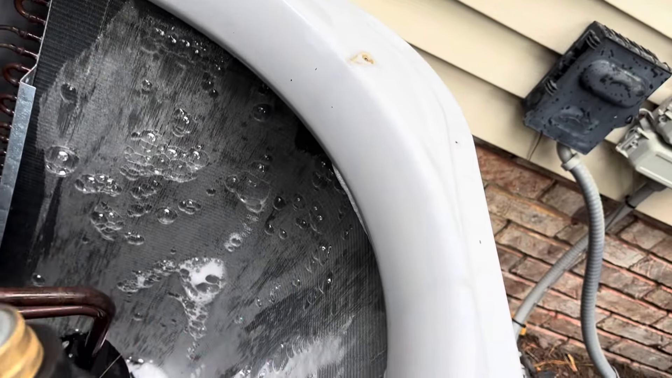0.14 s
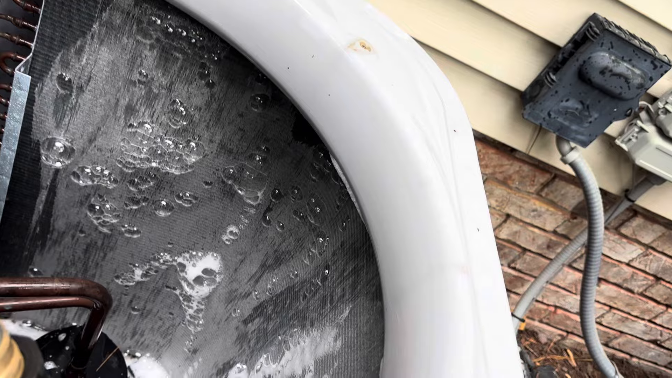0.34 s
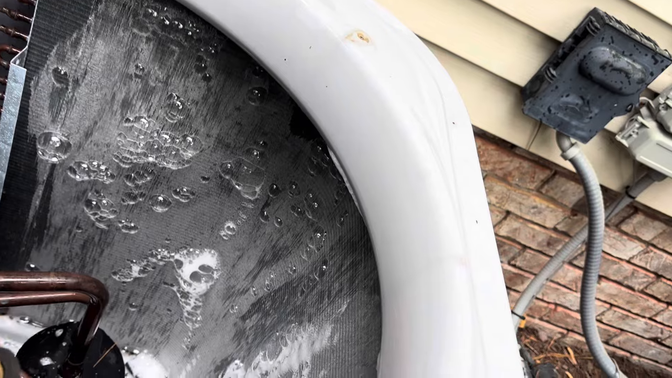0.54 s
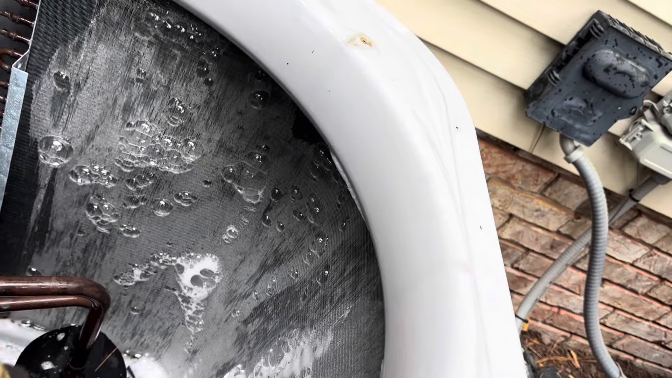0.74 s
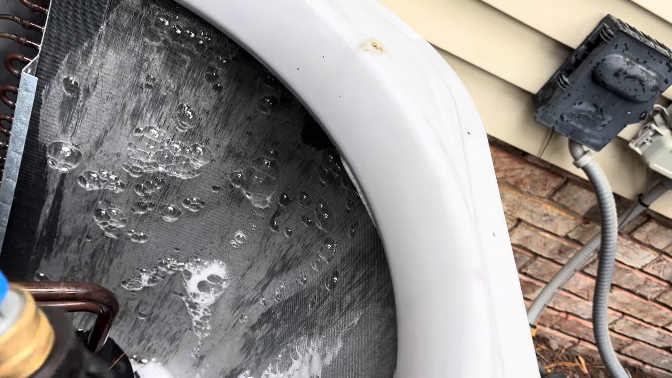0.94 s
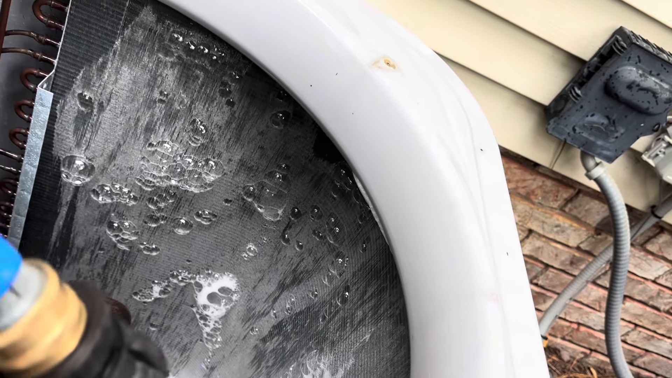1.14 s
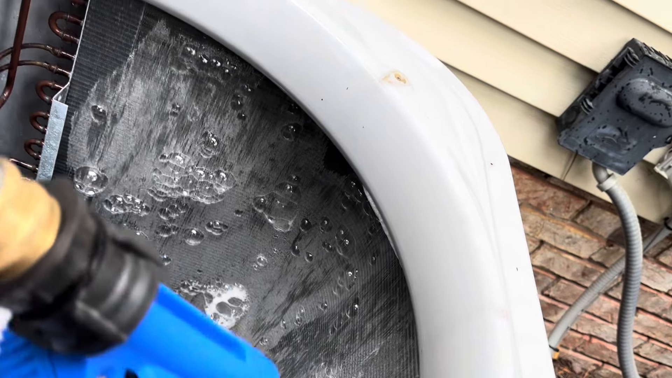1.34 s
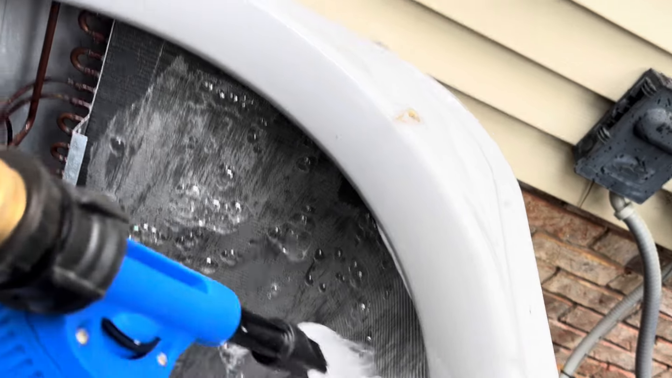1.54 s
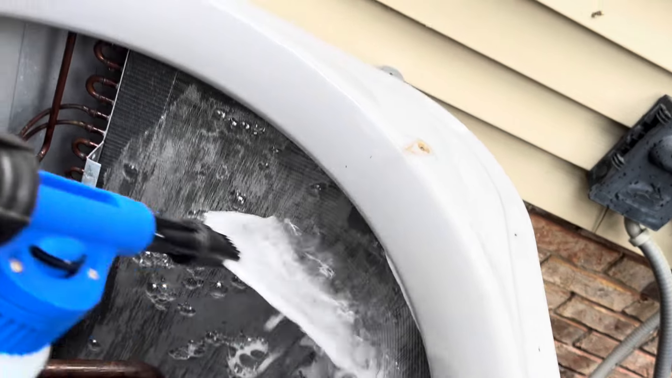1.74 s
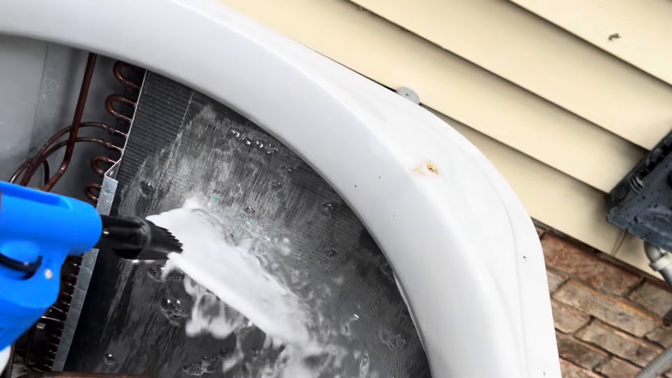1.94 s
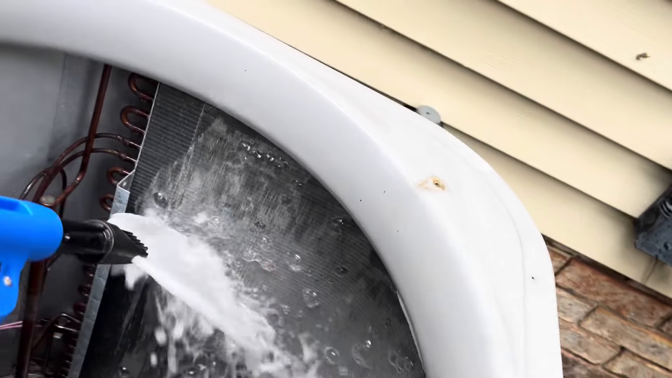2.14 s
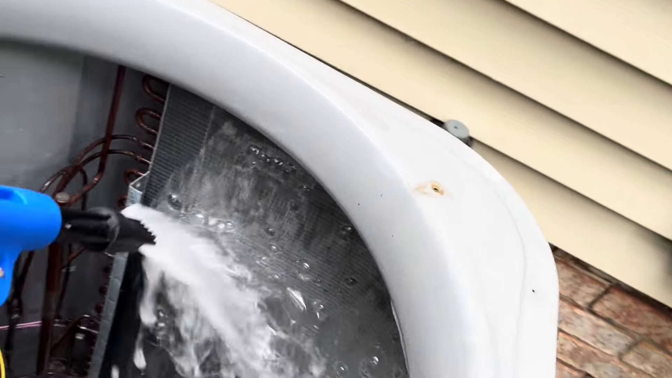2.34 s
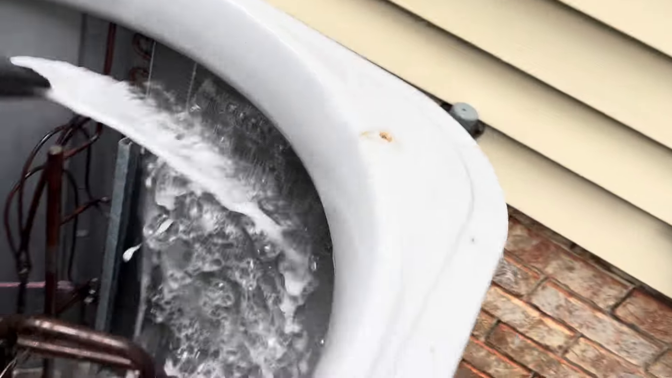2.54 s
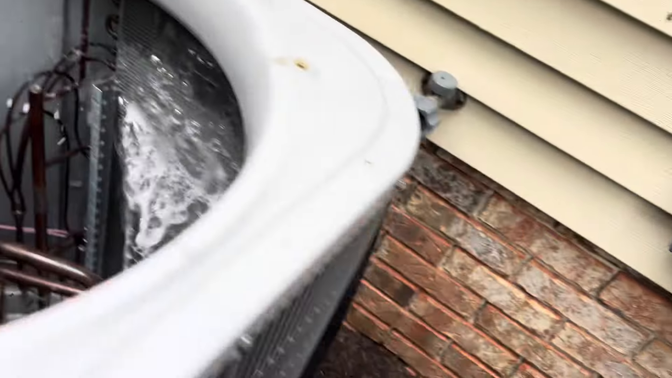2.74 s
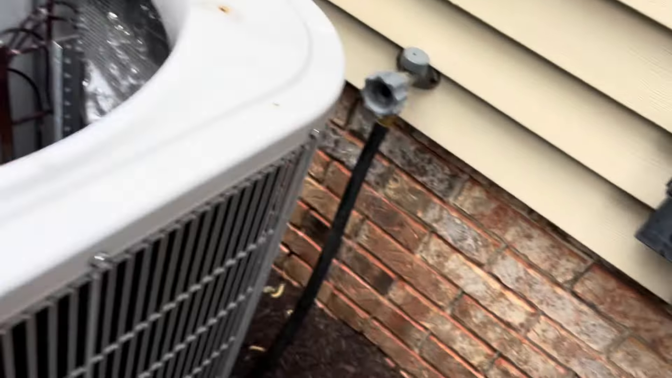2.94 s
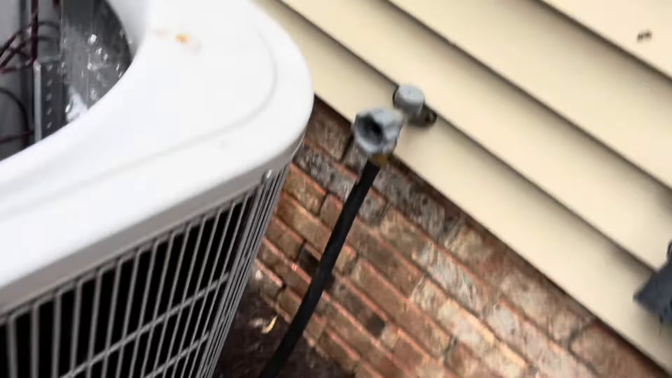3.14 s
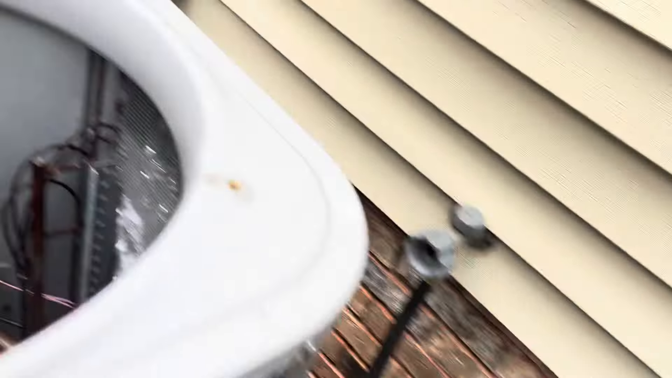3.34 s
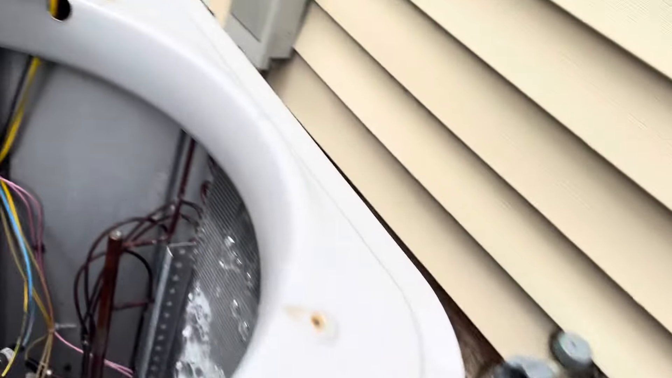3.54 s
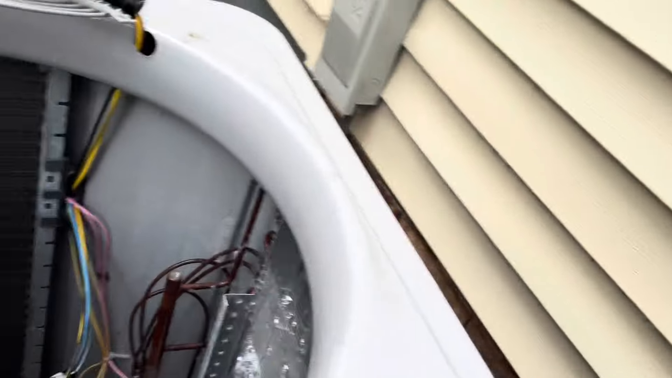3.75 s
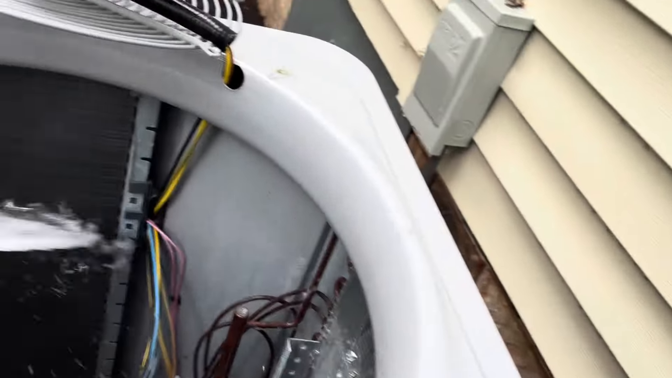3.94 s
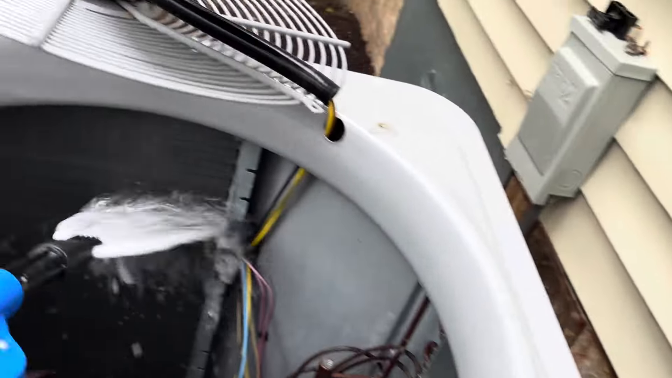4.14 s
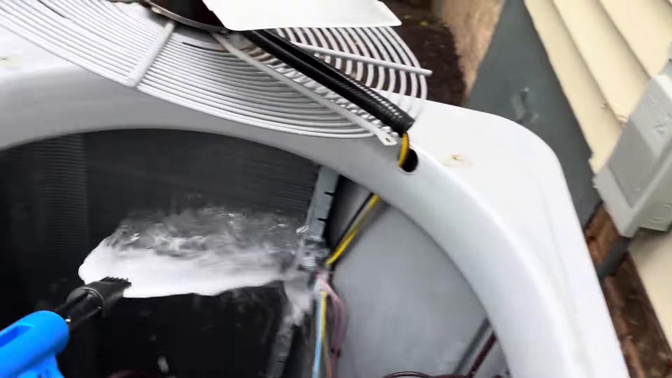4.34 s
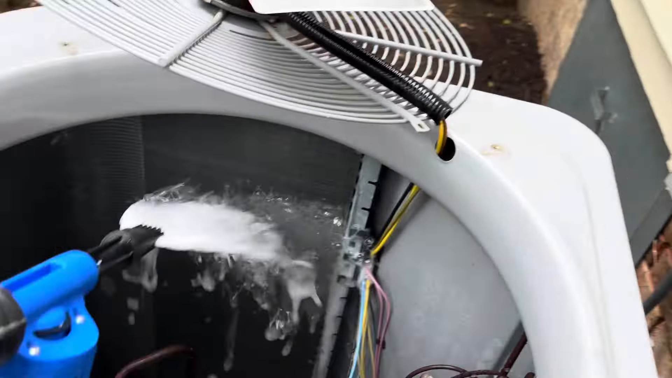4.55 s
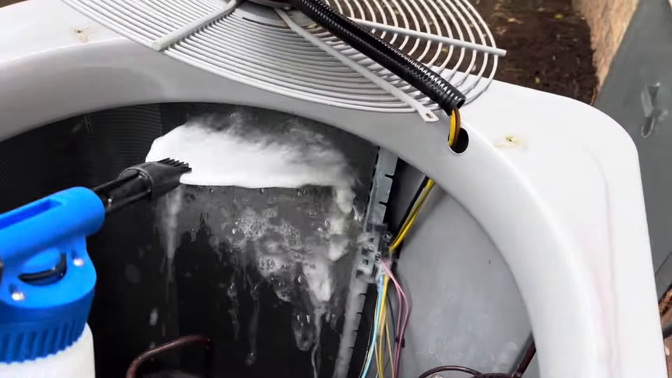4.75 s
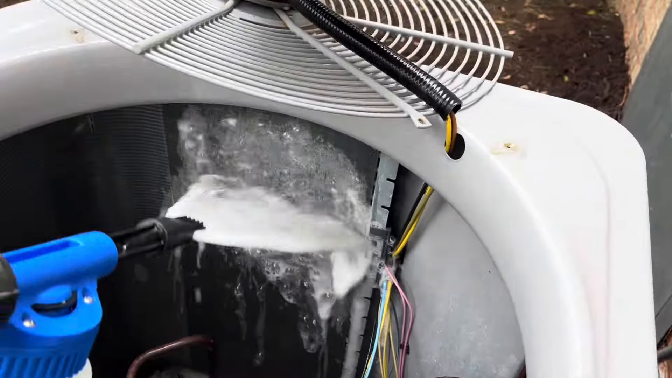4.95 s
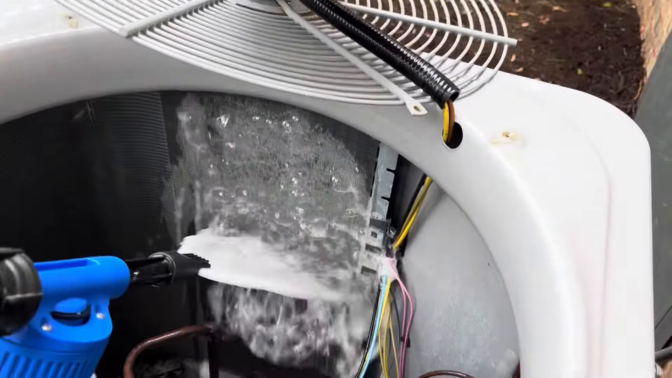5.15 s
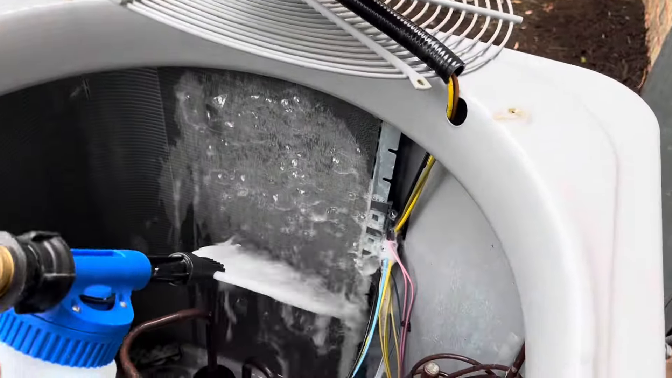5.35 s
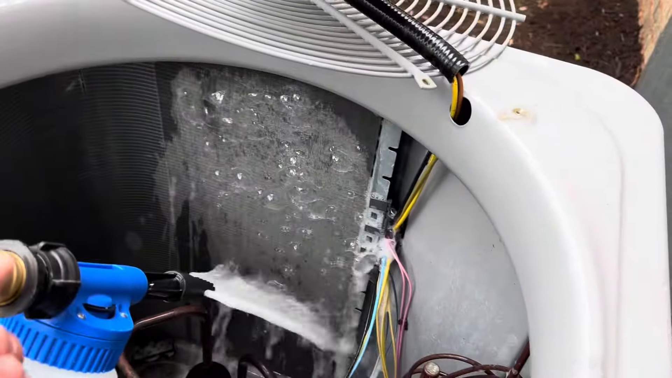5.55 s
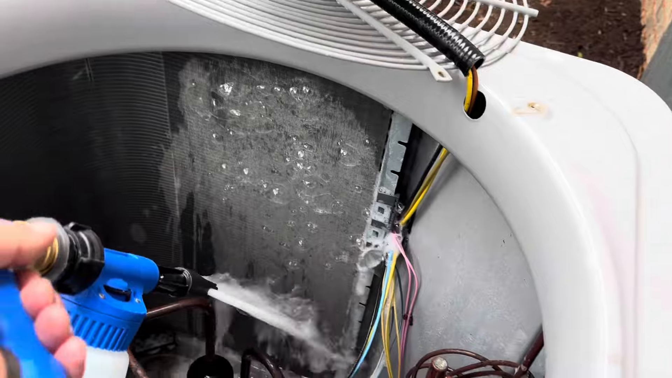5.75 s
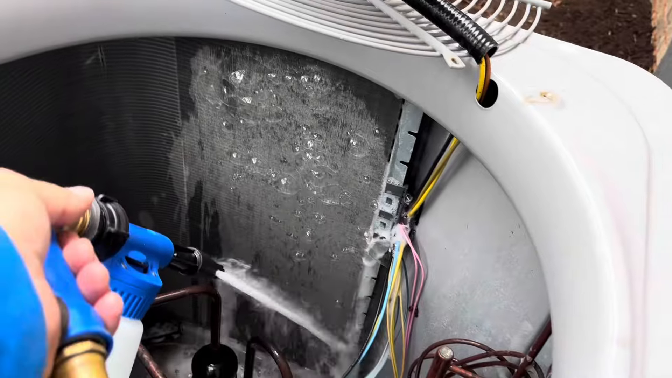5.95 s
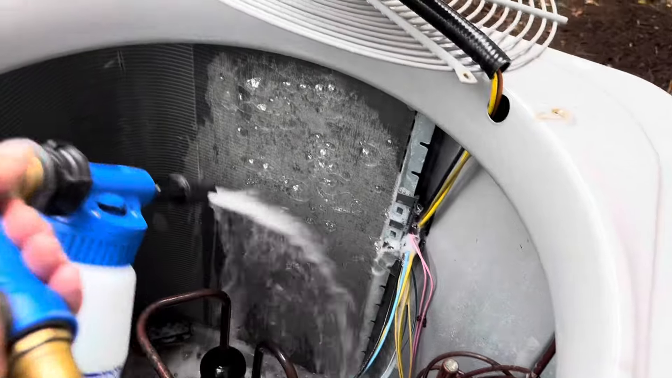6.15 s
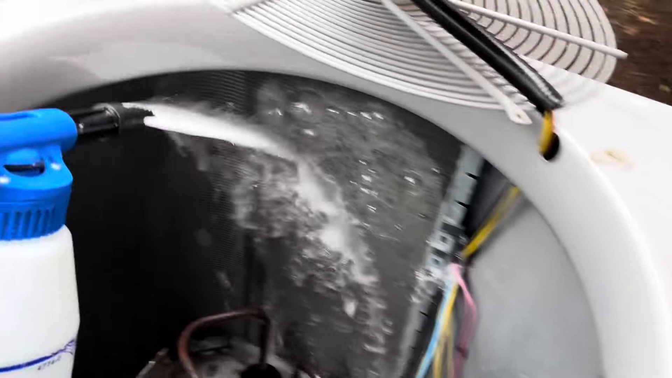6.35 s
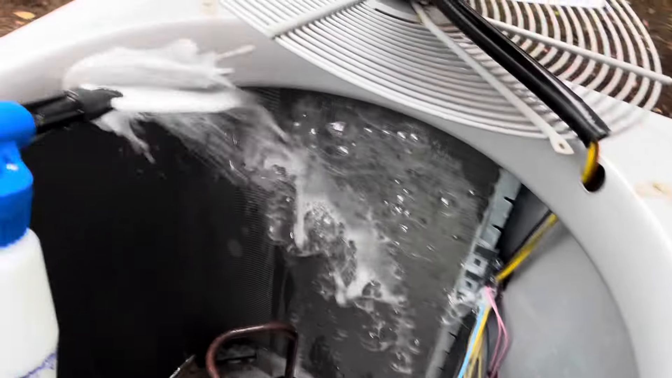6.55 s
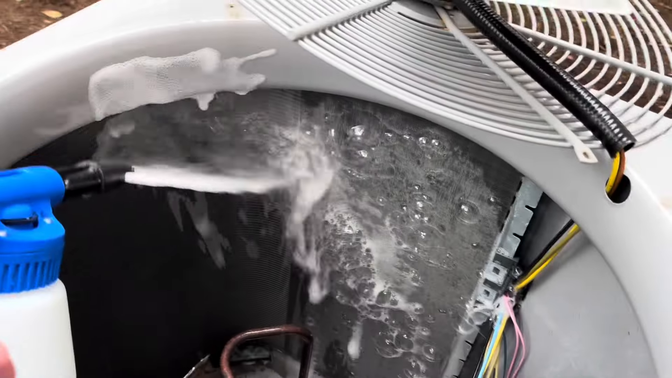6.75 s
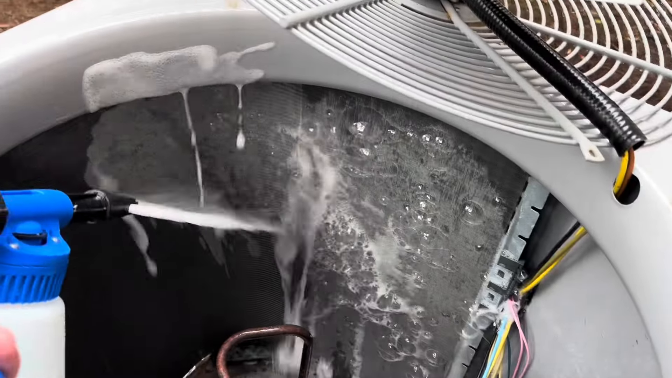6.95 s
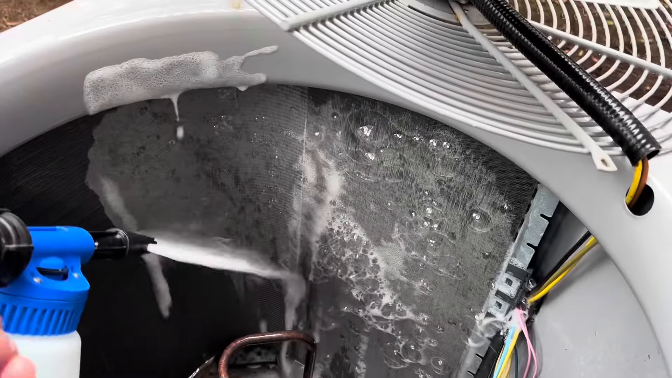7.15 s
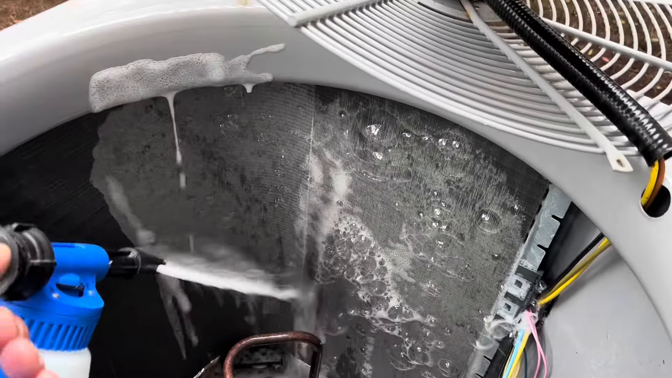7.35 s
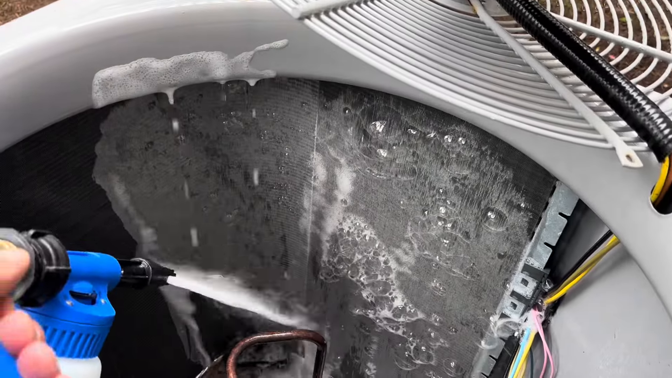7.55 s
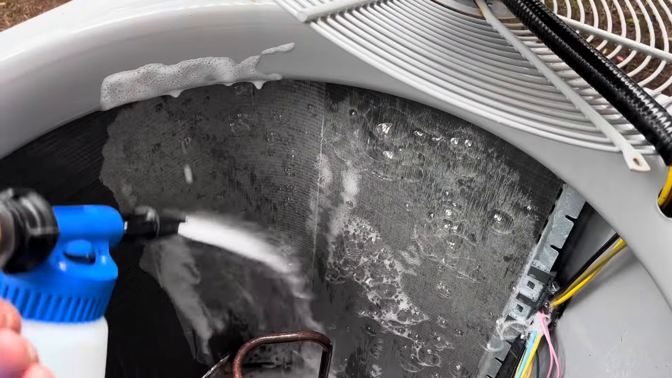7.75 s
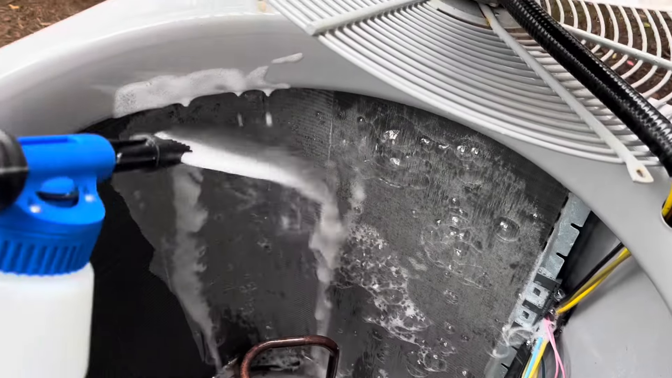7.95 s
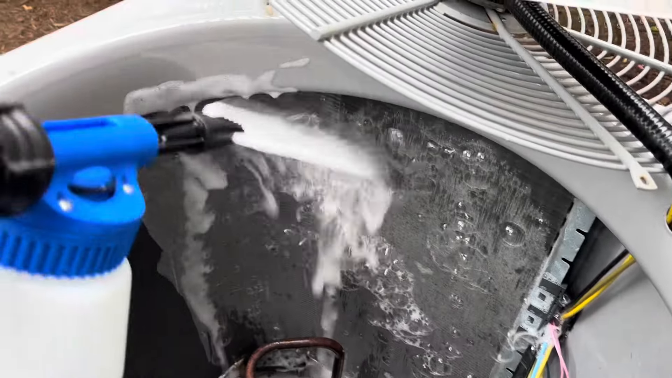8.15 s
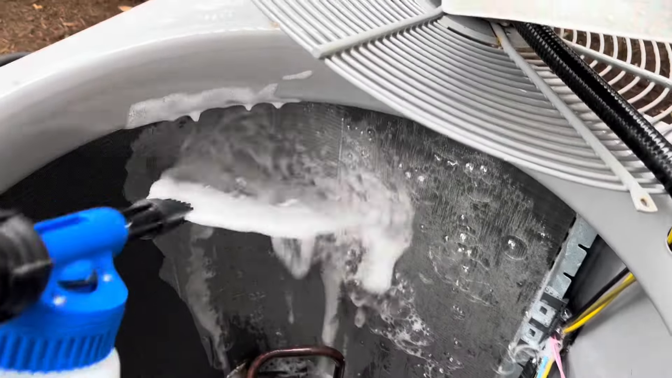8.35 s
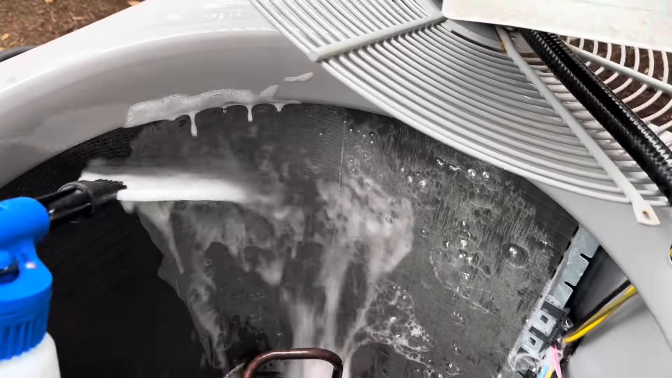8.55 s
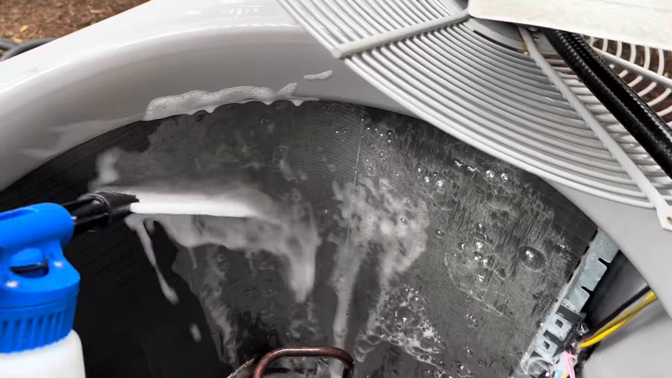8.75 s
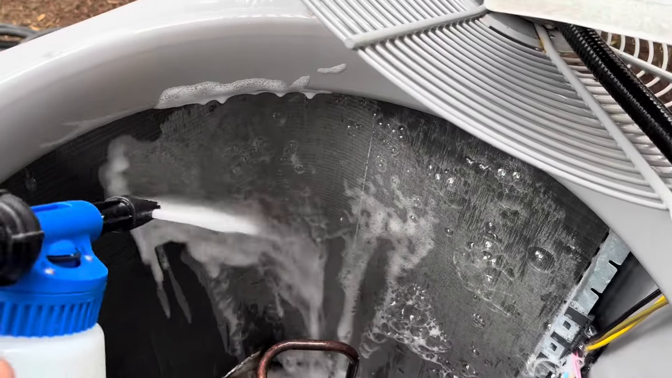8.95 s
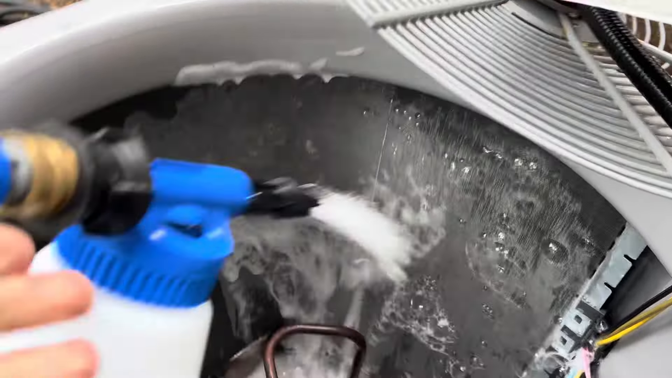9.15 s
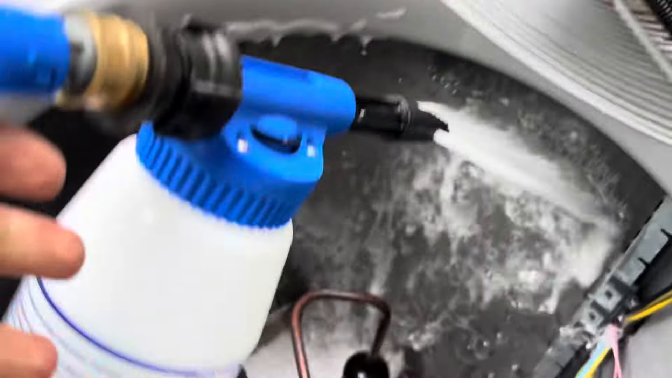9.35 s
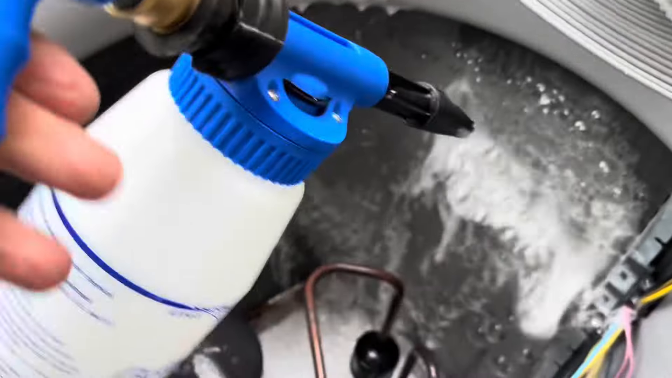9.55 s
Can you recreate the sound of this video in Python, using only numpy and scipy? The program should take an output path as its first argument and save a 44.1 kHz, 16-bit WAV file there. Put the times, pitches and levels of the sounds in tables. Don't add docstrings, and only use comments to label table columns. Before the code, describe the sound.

Close stereo outdoor sound of pressurized foam and water hitting thin metal fins: fizzing, whistling high hiss over a ringing splash and boxy gurgling wash. After about two and a half seconds it stops abruptly for about a second of clicks, bumps and light handling. A short airy hoot restarts it, more ringing, with dull panel knocks, low hose rumble and a final clacking stop.

```python
import sys
import numpy as np
from scipy import signal
from scipy.fft import rfft, irfft, next_fast_len
from scipy.io import wavfile
from scipy.ndimage import uniform_filter1d

SR = 44100
rng = np.random.default_rng(int(sys.argv[2]) if len(sys.argv) > 2 else 0)


def int16_out(signal):
    q = np.round(np.clip(np.atleast_2d(signal).T, -1, 1) * 32767)
    wavfile.write(sys.argv[1], SR, q.astype(np.int16))


def attenuation_scalar(level_db):
    decades = np.asarray(level_db, float) / 20
    return 10 ** decades


N = 427329

# (time [s], flow [dB], nearness to the fins [dB], depth in the casing [dB], whistle pitch [Hz])
GUN_PATH = [(0.0, -2, 3, 3.5, 6940), (0.55, -4.5, 0.5, -1.3, 7250), (1.2, 2.5, 4.5, 5, 7280),
            (1.5, 3.5, 5, 3, 7460), (1.75, -0.2, 2.5, 2.5, 7520), (2.45, 1.5, 1.1, 2, 7520),
            (3.7, -10.5, -11, 2.5, 7120), (3.77, -1, 4.5, -1.5, 7300), (3.87, -13.5, -6.5, -5.5, 7250),
            (4.11, 0, -2, -0.5, 7420), (4.7, 0, 1.9, -1, 7240), (5.5, 0, -2, -3.5, 7100),
            (6.4, 1.5, -1.6, -0.2, 7450), (6.85, -3.5, -1.5, -1.5, 7160), (7.6, -2, -2.5, -2, 7100),
            (8.1, 1.6, 0.5, 0.5, 7220), (8.7, -2.5, 0.6, 2.5, 7400), (9.3, 1, -0.6, 1, 7140)]
# (frequency [Hz], likeness [0-1], phase of the right port [half turns], left over right [dB])
MIC_PORTS = [(0, .97, 0, -.5), (300, .9, -.08, .5), (850, .75, -.27, 6), (1500, .75, -1, 4),
             (2250, .9, -2, 1), (3000, .7, -2.35, 4.5), (3500, .87, -2.12, 1.3), (4700, .9, -2, 0),
             (5500, .72, -1.75, -1.2), (6000, .72, -2.15, -1.5), (6500, .96, -2.05, 0),
             (7000, .97, -2.03, 0), (9000, .985, -1.35, 0), (16000, .985, 1.17, 0)]
# (frequency [Hz], level [dB])
CRACK_TONE = [(300, -10), (700, 0), (1500, 0), (2600, -1), (4400, -4), (5600, -15), (15000, -28)]
# (time [s], ground rumble [dB], water rush [dB], swell time [s])
HOSE_TUGS = [(0.05, -47, -44, 0.51), (1.08, -72, -42, 0.55), (1.91, -72, -52.5, 0.45),
             (2.67, -41, -59, 0.34), (3.8, -40.5, -42.5, 0.21), (4.17, -55, -44.5, 0.22),
             (4.33, -42, -43.5, 0.36), (4.76, -50, -43, 0.33), (4.97, -40.5, -53, 0.25),
             (5.42, -51, -52.5, 0.55), (5.91, -47, -54, 0.37), (6.62, -39, -46.5, 0.37),
             (7.55, -45.5, -52, 0.73), (8.05, -37.5, -42, 0.3), (8.45, -43.5, -52, 0.67),
             (9.43, -50, -49, .2), (9.69, -28, -60.5, 0.039)]


def evened(x):
    return x / np.sqrt(np.mean(abs(x) ** 2) + 1e-20)


def read(points, hz):
    f, value = np.transpose(points)
    return np.interp(np.log(hz + 1), np.log(f + 1), value)


def bins(size):
    hz = np.fft.rfftfreq(size, 1 / SR)[:, None]
    t = np.arange(4 * N // size + 5) * size / 4 / SR
    return hz, t


def humps(modes, hz, t):
    total = 0
    for f, width, first_db, second_db in modes:
        height_db = np.where(t < 3, first_db, second_db)
        total = total + height_db / (1 + (2 * (hz - f) / width) ** 2)
    return total


def noise(shape_db, size, patch_db, flicker_db, wide=8, long=12, far=1):
    hz, t = bins(size)
    a, b, c, d, patch = rng.standard_normal((len(t), len(hz), 5)).T
    patch = uniform_filter1d(patch, int(wide), 0)
    patch = evened(uniform_filter1d(patch, int(long), 1))
    flicker = evened(uniform_filter1d(rng.standard_normal(len(t)), 4))
    f, likeness = np.transpose(MIC_PORTS)[:2]
    same = np.clip(np.interp(hz, f, likeness), 0, 1) ** far
    left = a + 1j * b
    right = same * left + np.sqrt(1 - same ** 2) * (c + 1j * d)
    z = np.array([left, right]) * attenuation_scalar(shape_db + patch_db * patch + flicker_db * flicker)
    return evened(signal.istft(z, nperseg=size, noverlap=3 * size // 4)[1][:, :N])


def swells(rows):
    t, power = np.arange(0, N + 32, 32) / SR, 0
    for s, db, rise, fall in rows:
        away = np.where(t < s, (s - t) / rise, (t - s) / fall)
        power = power + attenuation_scalar(db - 20 * away) ** 2
    return np.interp(np.arange(N) / SR, t, np.sqrt(power))


def add(mix, s, sound):
    part = mix[:, round(s * SR):][:, :sound.shape[-1]]
    part += sound[..., :part.shape[1]]


def gun_at(column):
    path = np.transpose(GUN_PATH)
    return np.interp(np.arange(N) / SR, path[0], path[column])


def spray():
    opened, closing_db = valve()
    return opened * (nozzle(closing_db) + attenuation_scalar(closing_db) * splash() + wash())


def nozzle(closing_db):
    # (frequency [Hz], level [dB])
    fizz_tone = [(200, -30), (1500, -9), (4000, -6), (6000, -5), (8500, 0), (10000, -1), (12000, -2.5),
                 (14000, -1), (15650, -.5), (15900, -30)]
    # (rate [per s], reach [Hz])
    wrist_wobble = [(1.7, 108), (2.9, 80), (4.6, 50)]
    hz, t = bins(size=1024)
    path = np.transpose(GUN_PATH)
    pitch = np.interp(t, path[0], path[4])
    for rate, reach_hz in wrist_wobble:
        pitch = pitch + reach_hz * np.sin(2 * np.pi * rate * t)
    off = 2 * (hz - pitch)
    whistle_tone = 6 / (1 + (off / 380) ** 2) - 20 * np.log10(1 + (off / 2200) ** 2)
    fizz = noise(read(fizz_tone, hz), size=1024, patch_db=2.9, flicker_db=0.82, wide=5, long=32)
    whistle = noise(whistle_tone, size=1024, patch_db=3.0, flicker_db=0.7, wide=4, long=18)
    flow_db = gun_at(1) + closing_db
    fizz_db = -36 + np.maximum(0.31 * flow_db, -2)
    return attenuation_scalar(fizz_db) * fizz + attenuation_scalar(-37 + flow_db) * whistle


def splash():
    # (frequency [Hz], level [dB])
    splash_tone = [(600, -13), (1300, -1), (2000, -5), (3000, -5.5), (5000, -2), (6500, -9), (9000, -10.5)]
    # (frequency [Hz], width [Hz], first panel [dB], second panel [dB])
    fin_modes = [(1250, 140, -16, 0), (1690, 72, 0, 11), (2214, 58, 10, 8.5), (2640, 150, 5, 6.5),
                 (3306, 160, 7.5, 2), (3750, 200, 7.5, 7.5), (4675, 144, 9, 8), (5910, 190, 6, 10.5)]
    hz, t = bins(size=1024)
    tone = read(splash_tone, hz) + humps(fin_modes, hz, t)
    return attenuation_scalar(-38.5 + gun_at(2)) * noise(tone, size=1024, patch_db=2.0, flicker_db=0.6, wide=5, long=14)


def wash():
    # (frequency [Hz], level [dB])
    wash_tone = [(150, -38), (300, -3.5), (450, -3), (700, 0), (1200, -3), (2000, -10), (4000, -35)]
    # (frequency [Hz], width [Hz], first panel [dB], second panel [dB])
    hollow_modes = [(492, 92, 4, 5.2), (619, 51, 5.6, 6.6), (905, 140, 2.9, 11.6), (1160, 86, 4.7, 9.2)]
    hz, t = bins(size=1024)
    tone = read(wash_tone, hz) + humps(hollow_modes, hz, t)
    return attenuation_scalar(-45 + gun_at(3)) * noise(tone, size=1024, patch_db=2.5, flicker_db=0.5, wide=3, long=19)


def valve():
    # (opening time [s], shutting time [s])
    squeezes = [
        (-.01, 2.51),
        (3.699, 9.43),
    ]
    closing_s, most_loss_db = 0.041, -22
    t = np.arange(N) / SR
    opened = sum((t >= a) & (t < b) for a, b in squeezes)
    closing_db = sum(most_loss_db * np.clip(1 - abs(b - t) / closing_s, 0, 1) ** 2 for a, b in squeezes)
    return uniform_filter1d(opened * 1., size=130), closing_db


def purge():
    # (peak time [s], level [dB], rise [s], fall [s])
    air_spits = [
        (3.703, -39, .006, .1),
        (3.722, -32.5, .04, .15),
        (3.765, -34.5, .12, 0.13),
    ]
    # (frequency [Hz], width [Hz], level [dB])
    barrel_modes = [(2680, 150, 2), (2340, 400, -4), (4400, 550, -8)]
    hz, t = bins(size=512)
    power = sum(attenuation_scalar(db) ** 2 / (1 + (2 * (hz - f) / width) ** 2) ** 2 for f, width, db in barrel_modes)
    hoot = noise(10 * np.log10(power), size=512, patch_db=2.5, flicker_db=1.5)
    return valve()[0] * swells(air_spits) * hoot


def knocks():
    # (time [s], boom [dB], boom pitch [Hz], rattle [dB], crack [dB])
    gun_knocks = [(1.769, -27, 219, -47, -42), (2.525, -16, 267, -27, -29.5),
                  (2.565, -20.5, 90.7, -37.5, -44), (3.544, -42, 99.6, -44, -47),
                  (3.671, -14.5, 290.5, -31, -41), (4.125, -33, 149, -33, -46),
                  (4.18, -34, 142, -35.5, -46), (4.349, -24.5, 147, -44, -45), (4.74, -32, 90, -42, -50),
                  (6.433, -13, 124, -22, -26.5), (6.488, -13, 110, -26.5, -27),
                  (6.53, -20.5, 133, -25.5, -40), (7.375, -14, 163.6, -37, -51),
                  (7.953, -11, 107.9, -24, -27), (8.011, -19, 114.2, -28, -34.5),
                  (8.04, -14.5, 112.2, -48, -49), (8.351, -20, 81.7, -35, -42), (9.44, -41, 86, -55.5, -59),
                  (9.577, -10, 129, -23, -28.5), (9.619, -18, 120, -31, -53), (9.664, -18, 140, -32.5, -54)]
    # (time [s], boom [dB], boom pitch [Hz], die-away [cycles])
    bottle_thumps = [
        (2.542, -22.5, 260, 79),
        (3.683, -9, 188, 14),
        (8.35, -25.5, 291, 46),
        (9.588, -6, 244, 39),
        (5.964, -10.5, 145, 7.9),
    ]
    # (multiple of the boom pitch, level [dB])
    panel_modes = [(.6, -6), (0.999, 3), (1.4, -8.5), (2.08, -11)]
    # (frequency [Hz], level [dB])
    rattle_tone = [(120, -8), (250, -8.5), (500, 5.5), (800, 2), (1100, 2), (2000, -10.5), (4500, -25),
                   (8000, -45)]
    grit = noise(read(CRACK_TONE, bins(256)[0]), size=256, patch_db=2, flicker_db=.7)
    loose = noise(read(rattle_tone, bins(512)[0]), size=512, patch_db=2.5, flicker_db=1.5)
    out, t = np.zeros((2, N)), np.arange(SR // 2) / SR
    blows = [(*row, 33) for row in gun_knocks]
    blows += [(s, db, f, -50, -60, cycles) for s, db, f, cycles in bottle_thumps]
    chances = rng.random((len(blows), len(panel_modes) + 1))
    for (s, boom_db, f, rattle_db, crack_db, cycles), luck in zip(blows, chances):
        start = int(luck[-1] * (N - len(t)))
        piece = slice(start, start + len(t))
        t60 = cycles / f
        add(out, s, attenuation_scalar(crack_db + 4.5 - 60 * t / 0.038) * grit[:, piece])
        rattle_swell = 1 - np.exp(-t / 0.0032)
        add(out, s, attenuation_scalar(rattle_db + 0.5 - 60 * t / (0.6 * t60)) * rattle_swell * loose[:, piece])
        boom = sum(attenuation_scalar(db) * np.sin(2 * np.pi * (f * k * t + u)) for (k, db), u in zip(panel_modes, luck))
        boom_swell = 1 - np.exp(-(t / 0.0074) ** 2)
        add(out, s, attenuation_scalar(boom_db - 9.5 - 60 * t / t60) * boom_swell * boom)
    return out


def ticks():
    # (time [s], level [dB], pitch [Hz], 60 dB die-away [s], snap [dB])
    plastic_ticks = [(2.2655, -21.5, 2105, 0.036, -15), (2.275, -22, 2000, 0.012, -4),
                     (2.598, -36.5, 1900, 0.015, 5), (2.6394, -60, 1250, 0.04, -6),
                     (2.6594, -49, 1430, 0.04, -6), (2.7124, -53, 1200, 0.036, -2),
                     (2.7492, -48, 2100, 0.051, -8), (2.7694, -47, 1960, 0.08, -13),
                     (2.829, -31, 1820, 0.036, -19), (3.2839, -56, 1520, 0.04, -4),
                     (3.4793, -39, 1250, 0.042, -13), (3.528, -19, 1450, 0.029, -27),
                     (3.5754, -34, 1440, 0.048, -11), (5.891, -34.5, 4000, 0.048, 2.5),
                     (6.6244, -33, 4520, 0.03, 4), (9.4516, -40, 1810, 0.033, 1)]
    # (time [s], level [dB], pitch [Hz], 60 dB die-away [s], snap [dB])
    lever_clacks = [
        (2.497, -20, 507, 0.031, -6),
        (2.504, -27.5, 596, 0.045, 1),
        (9.419, -26, 455, 0.059, 0),
    ]
    # (multiple of the pitch, level [dB])
    plastic_modes = [(.93, -3), (1.05, -3), (1.4, -17), (2.3, -27)]
    grit = noise(read(CRACK_TONE, bins(256)[0]), size=256, patch_db=2, flicker_db=.6)
    out, t = np.zeros((2, N)), np.arange(5000) / SR
    events = plastic_ticks + lever_clacks
    for (s, db, pitch, t60, snap_db), luck in zip(events, rng.random((len(events), 4))):
        ring = sum(attenuation_scalar(d) * np.sin(2 * np.pi * (pitch * k * t + u)) for (k, d), u in zip(plastic_modes, luck))
        ring = attenuation_scalar(-60 * t / t60) * ring * (1 - np.exp(-t / 0.00057))
        snap = attenuation_scalar(snap_db - 60 * t / 0.016) * grit[:, round(s * SR):][:, :len(t)]
        add(out, s, attenuation_scalar(db) * (ring + snap))
    return out


def rustles():
    # (peak time [s], level [dB], rise [s], fall [s])
    hand_moves = [(2.528, -43.5, 0.056, 0.1), (2.61, -52.5, .2, 0.12), (2.827, -51, .003, 0.023),
                  (2.909, -57, .007, .07), (2.95, -65, .05, 0.33), (3.115, -59, 0.014, .15),
                  (3.17, -56.5, 0.085, 0.035), (3.29, -61, .012, .04), (3.4, -60.5, .02, .12),
                  (3.52, -68, .25, .6), (3.56, -51, 0.087, 0.14), (3.671, -46, .004, 0.17),
                  (9.425, -31, .005, 0.0082), (9.455, -45, 0.035, 0.061), (9.61, -50, 0.056, 0.052),
                  (9.68, -50, .012, .3)]
    # (frequency [Hz], level [dB])
    rustle_tone = [(300, 2.5), (1000, -1), (2500, -4), (5000, -10.5), (8000, -12), (12000, -14.5),
                   (15500, -16), (16000, -30)]
    tone = read(rustle_tone, bins(256)[0])
    brushing = noise(tone, size=256, patch_db=2.5, flicker_db=2.5, wide=4.9, long=10, far=11.0)
    return attenuation_scalar(4.5) * swells(hand_moves) * brushing


def hose():
    # (frequency [Hz], level [dB])
    hose_tone = [(80, -46), (140, 1), (200, 3), (250, 2.5), (330, 0), (600, -22.5)]
    rush = np.hypot(attenuation_scalar(-68), swells([(s, db, d, d) for s, _, db, d in HOSE_TUGS]))
    tone = read(hose_tone, bins(2048)[0])
    return rush * noise(tone, size=2048, patch_db=2.5, flicker_db=3.3, wide=3, long=4.6)


def rumble():
    # (frequency [Hz], level [dB])
    ground_tone = [(18, -40), (35, -30), (56, 2), (75, -1.5), (105, -1.5), (135, -17), (170, -11.5),
                   (260, -21), (1000, -30.5), (1500, -70)]
    linger = 2.06
    shake = np.hypot(attenuation_scalar(-46.5), swells([(s, db, linger * d, linger * d) for s, db, _, d in HOSE_TUGS]))
    tone = read(ground_tone, bins(2048)[0])
    return shake * noise(tone, size=2048, patch_db=2.0, flicker_db=2.0, wide=3.6, long=6.6)


def yard():
    # (frequency [Hz], level [dB])
    yard_tone = [(120, -24), (200, -16), (219, -9.5), (439, -6), (505, -12), (827, -20), (908, -12.5),
                 (8000, -38.5), (10400, -74), (17600, -120)]
    return attenuation_scalar(-59.5) * noise(read(yard_tone, bins(2048)[0]), size=2048, patch_db=1.5, flicker_db=.6, far=5)


def scene():
    return spray() + purge() + knocks() + ticks() + rustles() + hose() + rumble() + yard()


def top_cut(x):
    return signal.sosfilt(signal.butter(12, 15780, fs=SR, output="sos"), x)


def record(dry):
    size = next_fast_len(N + 2048)
    hz = np.fft.rfftfreq(size, 1 / SR)
    f, _, half_turns, tilt_db = np.transpose(MIC_PORTS)
    turn = np.pi * np.interp(hz, f, half_turns)
    turn = turn - .2 * np.sin(2 * turn) * (hz > 7000)
    half_db = np.interp(hz, f, tilt_db) / 2
    left_right = [attenuation_scalar(half_db), attenuation_scalar(-half_db) * np.exp(1j * turn)]
    ports = irfft(rfft(dry, size) * left_right, size)[:, :N]
    return top_cut(ports)


dry = scene()
out = record(dry)
int16_out(out)
```